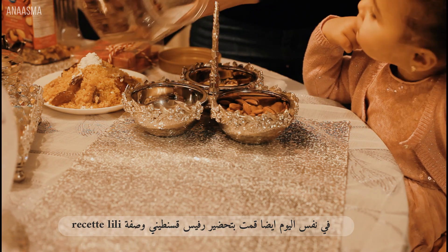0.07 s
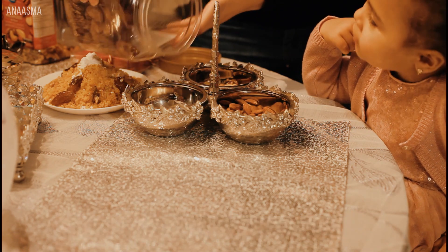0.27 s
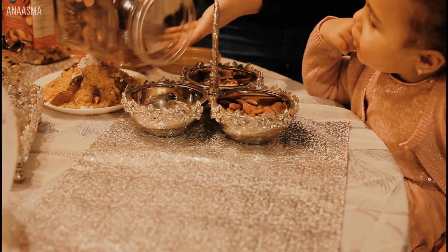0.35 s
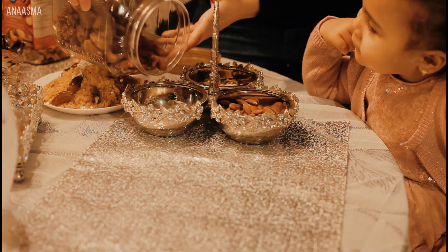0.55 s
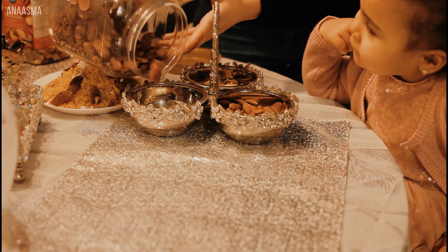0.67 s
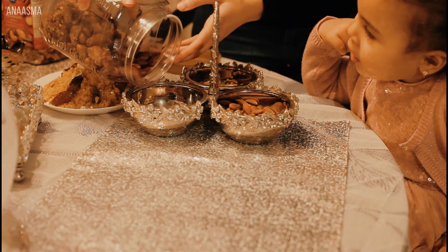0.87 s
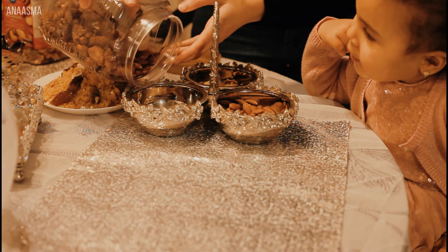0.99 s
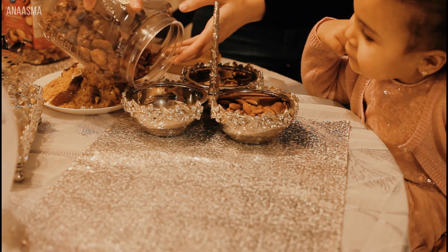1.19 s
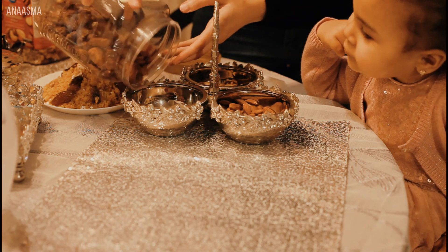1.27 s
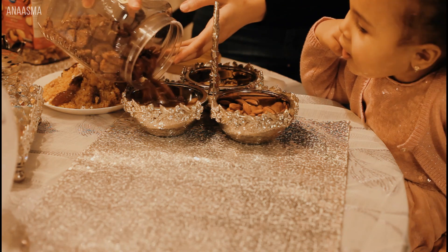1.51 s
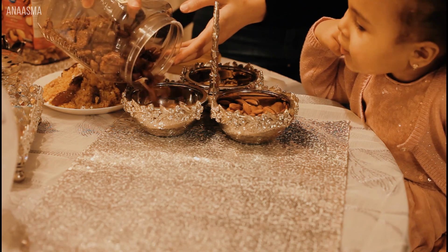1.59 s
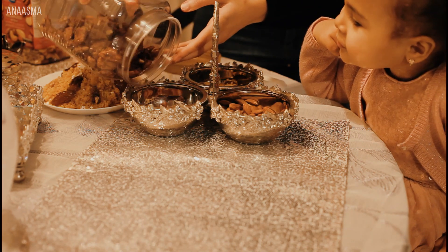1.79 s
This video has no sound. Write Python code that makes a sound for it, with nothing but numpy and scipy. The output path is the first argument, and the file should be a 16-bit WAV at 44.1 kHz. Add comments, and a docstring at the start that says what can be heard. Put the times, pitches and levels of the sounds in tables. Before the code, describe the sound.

Nuts knock and clatter hollowly inside a jar, loudest early on, then drop singly into a small ringing metal bowl; another brief tumble and more clinks follow, close microphone in a quiet room.

```python
"""Nuts from a jar into a metal bowl

Nuts tumble inside a tilted jar: each knock is a hollow thud of decaying sines plus a crack of noise.
They drop a few at a time into a small metal bowl: a noise tick, then sines ringing in families of modes.
A few nuts ping on the glass, one dull push comes through the table, and a rustle fades early on.
The room is quiet and adds a short echoing tail; the loudest knocks overload the input."""
import sys
import numpy as np
from scipy import signal
from scipy.fft import rfft, irfft
from scipy.io import wavfile

SR = 44100
rng = np.random.default_rng(int(sys.argv[2]) if len(sys.argv) > 2 else 0)


def file_out(sig):
    """Save sig as 16-bit WAV at sys.argv[1]."""
    # one column per channel
    cols = np.atleast_2d(sig).T
    # limit, then scale
    lim = np.clip(cols, -1, 1)
    pcm = np.round(lim * 32767).astype(np.int16)
    wavfile.write(sys.argv[1], SR, pcm)


def elevation(decibels):
    """Turn decibel levels (scalar or array-like) into linear amplitude ratios."""
    levels = np.asarray(decibels, float)
    return 10 ** (levels / 20)


N = 81585  # length in samples
RING_RISE_S = 0.0005  # how fast the bowl and the glass start to ring


def evened(x):
    """Scales a sound to an average (rms) level of 1."""
    return x / np.sqrt(np.mean(x ** 2) + 1e-20)


def read_table(points, hz):
    """Reads a table of (Hz, value) between its rows, on a log-frequency axis."""
    table_hz, value = np.transpose(points)
    return np.interp(np.log(hz + 1), np.log(table_hz + 1), value)


def level_curve(rows, column):
    """Gain over time, read from one dB column of a table whose first column is seconds."""
    rows = np.array(rows)
    return elevation(np.interp(np.arange(N) / SR, rows[:, 0], rows[:, column]))


def coloured(x, points):
    """Filters a sound by a table of (Hz, dB)."""
    hz = np.fft.rfftfreq(len(x), 1 / SR)
    return irfft(rfft(x) * elevation(read_table(points, hz)), len(x))


def low_cut(x, hz):
    """Steep high-pass filter: takes away what lies below hz."""
    return signal.sosfilt(signal.butter(4, hz, "high", fs=SR, output="sos"), x)


def add(mix, start_s, sound):
    """Mixes a sound in, starting at start_s seconds."""
    part = mix[max(round(start_s * SR), 0):][:len(sound)]
    part += sound[:len(part)]


def burst(points, t60, rise_s):
    """A short puff of coloured noise with a quick rise; t60 is the seconds it takes to fall 60 dB."""
    t = np.arange(2048) / SR
    noise = evened(coloured(rng.standard_normal(len(t)), points))
    return noise * elevation(-60 * t / t60) * (1 - np.exp(-t / rise_s))


def rattle(shapes, per_s, spread_db):
    """Random clicks of uneven size, each playing one of the shapes; rms 1 overall."""
    happens = rng.random(N) < per_s / SR
    size = elevation(spread_db * np.minimum(rng.exponential(1, N), 4)) * happens
    pick = rng.integers(0, len(shapes), N)
    return evened(sum(signal.oaconvolve(size * (pick == k), shape)[:N] for k, shape in enumerate(shapes)))


# Colour of the steady room tone. Each row: frequency in Hz, relative strength in dB per Hz.
AIR_COLOUR = [(20, -40), (300, -14), (500, -20), (850, -20), (1600, -4.5), (2300, -7), (5800, -7.5),
              (8000, -22), (16000, -69)]
# Colour of the early rustle. Each row: frequency in Hz, relative strength in dB per Hz.
RUSTLE_COLOUR = [(20, -18), (130, 1.5), (260, -1.5), (400, -27), (6000, -13), (10000, -17), (14000, -19)]
# Loudness of the early rustle. Each row: time in seconds, rms level in dB.
RUSTLE_LEVEL = [(0.0, -63), (.3, -65), (.42, -86.5), (1.85, -92)]


def background():
    """Two coloured noises: steady room tone, and a rustle with a low rumble that fades."""
    air_noise, rustle_noise = rng.standard_normal((2, N))
    air = elevation(-61.5) * evened(coloured(air_noise, AIR_COLOUR))
    rustle = level_curve(RUSTLE_LEVEL, column=1) * evened(coloured(rustle_noise, RUSTLE_COLOUR))
    return air + rustle


# Tones of the jar's hollow. Each row: pitch as a ratio of the main pitch, relative level in dB,
# time to fall 60 dB in seconds.
HOLLOW_TONES = [(0.599, -10, 0.032), (0.82, -2, 0.03), (0.999, 3.5, 0.028), (1.191, -5, 0.019),
                (1.8, -13.5, 0.02), (2.3, -11, 0.022)]


def thud(hz):
    """The air in the jar's hollow rings for a few cycles as decaying sines, peak 1."""
    t = np.arange(4096) / SR
    x = sum(elevation(db - 60 * t / t60) * np.sin(2 * np.pi * ratio * hz * t) for ratio, db, t60 in HOLLOW_TONES)
    x = x * (1 - np.exp(-t / 0.0019)) ** 2  # soft rise, in seconds
    return x / abs(x).max()


# Colour of a nut striking the wall. Each row: frequency in Hz, relative strength in dB per Hz.
CRACK_COLOUR = [(410, -20), (700, -49), (852, -7), (1870, -6.5), (5840, -13), (8100, -26), (10800, -25),
                (16000, -45.5)]
SHELL_HZ, SHELL_WIDTH, SHELL_DB = (1750, 4900), 0.16, 2  # range, width in log frequency, boost


def crack(t60):
    """A nut hitting the wall: a puff of noise with one broad resonance of its own."""
    x = burst(CRACK_COLOUR, t60, rise_s=0.0021)
    centre_hz = np.exp(rng.uniform(*np.log(SHELL_HZ)))
    away = np.log(np.fft.rfftfreq(len(x), 1 / SR) / centre_hz + 1e-9) / SHELL_WIDTH
    return irfft(rfft(x) * elevation(SHELL_DB * np.exp(-away ** 2)), len(x))


# The heap of nuts tumbling. Each row: time in seconds, level of the hollow rumble in dB,
# level of the crackle in dB.
TUMBLE_LEVELS = [(0.0, -50, -56.5), (.08, -63.5, -63), (.2, -53, -67.5), (.25, -44, -55), (.31, -43, -46.5),
                 (.36, -44, -50.5), (.42, -43.5, -53.5), (.46, -47, -48), (.53, -43, -46.5),
                 (.57, -50.5, -52), (.72, -51.5, -57.5), (.79, -61, -65.5), (.86, -69.5, -57.5),
                 (1.1, -61.5, -61.5), (1.19, -70.5, -69.5), (1.25, -57.5, -58), (1.32, -46, -49),
                 (1.36, -54.5, -53), (1.45, -45.5, -49), (1.51, -67, -52.5), (1.6, -72, -53.5),
                 (1.76, -92, -64), (1.85, -99, -69)]


def tumbling():
    """Many small random thuds blur into a rumble, and many tiny cracks into a crackle."""
    thuds = [thud(533 * ratio) for ratio in rng.uniform(0.806, 1.19, size=12)]  # around 533 Hz
    rumble = rattle(thuds, per_s=240, spread_db=2)
    crackle = rattle([crack(t60=0.0048) for _ in range(20)], per_s=1300, spread_db=2)
    return level_curve(TUMBLE_LEVELS, column=1) * rumble + level_curve(TUMBLE_LEVELS, column=2) * crackle


# Single nuts knocking the jar wall. Each row: start in seconds, level of the hollow thud in dB,
# main pitch of the hollow in Hz, level of the crack in dB above the thud.
KNOCKS = [(0.004, -43, 485, -7), (0.097, -40.5, 506, -34), (0.15, -44.5, 556, -22),
          (0.2235, -28.5, 494, -8), (0.256, -32, 493, 5), (0.267, -22, 504, -2), (0.297, -40.5, 640, 11.5),
          (0.325, -19.5, 563, 2), (0.336, -28, 648, -25), (0.34, -33.5, 485, -8), (0.382, -29.5, 505, 0),
          (0.391, -29.5, 496, 2.5), (0.436, -40, 533, 8.5), (0.48, -34.5, 424, 4), (0.499, -27, 550, -1.5),
          (0.514, -31.5, 506, -2), (0.636, -45.5, 530, 10), (0.686, -43.5, 520, 3.5),
          (0.7627, -40.5, 552, -3.5), (1.208, -44, 577, -26), (1.281, -38, 462, -14),
          (1.311, -33, 442, 1.5), (1.395, -42, 500, 7), (1.432, -36, 530, -15), (1.462, -45, 498, 15),
          (1.467, -37.5, 563, 12.5), (1.68, -51.5, 474, 7)]


def knocks():
    """Each knock sounds the hollow and the wall together: one thud and one crack."""
    out = np.zeros(N)
    for start_s, thud_db, hz, crack_db in KNOCKS:
        add(out, start_s, elevation(thud_db) * thud(hz))
        add(out, start_s, elevation(thud_db + crack_db) * crack(t60=0.021))
    return out


def jar():
    """Knocks over the tumbling heap; so small a body radiates little below 285 Hz."""
    return low_cut(knocks() + tumbling(), 285)


# How fast the room's tail dies. Each row: frequency in Hz, time to fall 60 dB in seconds.
ROOM_DECAY = [(300, 0.087), (1500, 0.16), (5000, 0.19), (12000, 0.039)]


def room(x):
    """Echoes off the room: sparse taps of random sign, each band dying at its own speed."""
    taps = np.zeros(SR // 2)
    at = np.arange(200, SR // 2 - 20, 20)
    taps[at + rng.integers(0, 20, len(at))] = rng.choice([-1., 1.], len(at))
    hz, t, bands = signal.stft(taps, SR, nperseg=256)
    fade = elevation(-60 * t / read_table(ROOM_DECAY, hz)[:, None])
    tail = signal.istft(bands * fade, SR, nperseg=256)[1]
    return signal.fftconvolve(x, tail / np.linalg.norm(tail))[:N]


# Nuts that strike the glass squarely. Each row: start in seconds, level in dB, pitch in Hz.
PINGS = [(0.393, -42.5, 3070), (0.4357, -34, 2390), (0.4363, -34.5, 3470), (0.64, -41, 3440)]


def pings():
    """Short pitched rings of glass: a sine that falls 60 dB in 0.023 s."""
    out, t = np.zeros(N), np.arange(2048) / SR
    for start_s, db, hz in PINGS:
        envelope = elevation(db - 60 * t / 0.023) * (1 - np.exp(-t / RING_RISE_S))
        add(out, start_s, envelope * np.sin(2 * np.pi * hz * t))
    return out


# Clusters of bowl modes. Each row: centre in Hz, spread in Hz (modes lie within twice this either side),
# relative level in dB, time to fall 60 dB in seconds for the ring alone.
BOWL_MODES = [(1354, 60, -7, 0.35), (1675, 66, -2, 0.32), (2077, 150, -15.5, 0.95), (3504, 68, -0.5, 0.18),
              (4570, 260, 0, 0.18), (5780, 90.6, 0, 0.39), (8420, 130, -10, 0.46), (9300, 69, -3.5, 0.15),
              (11000, 250, -3, 0.13), (13800, 500, -1.5, 0.037)]
# Borders between the low, middle, high and top families of modes. Each entry: frequency in Hz.
FAMILY_EDGES = [2600, 4400, 7200]
# Colour of the tick as a nut touches metal. Each row: frequency in Hz, relative strength in dB.
TICK_COLOUR = [(1000, 17), (1700, 19), (5700, 27), (12000, 21), (16000, 6)]
CLUSTER = 8  # modes in a cluster
STRIKE_SPREAD_DB, CLUSTER_SPREAD_DB = 3, 3  # random change per mode, and per top cluster
CONTACT_T60, AFTER_DB = 0.022, -13  # loud while the nut is in contact, then a fainter free ring
TICK_FOLLOWS = 0.64  # how far the tick takes the colour of the ring, 0 to 1


def clink(families_db, detune):
    """A tick and the ring of the bowl, each family of modes at its own strength."""
    hz, spread, db, t60 = np.repeat(BOWL_MODES, CLUSTER, axis=0).T[:, :, None]
    t, family_db = np.arange(6144) / SR, np.array(families_db)
    strike_db = STRIKE_SPREAD_DB * rng.standard_normal((len(hz), 1))
    # the top clusters vary with the spot struck
    spot_db = CLUSTER_SPREAD_DB * np.repeat(rng.standard_normal((len(BOWL_MODES), 1)), CLUSTER, axis=0)
    db = db + family_db[np.searchsorted(FAMILY_EDGES, hz)] - 13.5  # the last is the ring's share
    db = db + strike_db + spot_db * (hz > FAMILY_EDGES[-1])
    ring = (elevation(db - 60 * t / t60) * np.sin(2 * np.pi * (hz + spread * detune) * t)).sum(axis=0)
    ring = ring * (elevation(-60 * t / CONTACT_T60) + elevation(AFTER_DB)) * (1 - np.exp(-t / RING_RISE_S))

    tick = burst(TICK_COLOUR, t60=0.02, rise_s=0.00053) * elevation(-0.5)
    bands = np.searchsorted(FAMILY_EDGES, np.fft.rfftfreq(len(tick), 1 / SR))
    strongest_db = family_db.max()
    tick_db = TICK_FOLLOWS * (family_db[bands] - strongest_db) + strongest_db
    add(ring, 0, irfft(rfft(tick) * elevation(tick_db), len(tick)))
    return ring


# Nuts landing in the bowl. Each row: start in seconds, then the levels in dB of the low, middle,
# high and top families of modes.
DROPS = [(0.822, -25, -43, -38.5, -46), (0.8324, -34, -42, -69, -57), (0.8821, -35.5, -40.5, -63, -69),
         (0.9252, -35.5, -40.5, -41.5, -68), (0.956, -70, -58, -51, -47.5), (0.962, -41, -42, -42, -52),
         (1.0039, -33, -47.5, -43.5, -53), (1.0256, -31.5, -31.5, -37, -54), (1.0649, -44, -47, -58, -54),
         (1.1385, -41, -39, -47.5, -55), (1.1833, -43.5, -47.5, -51, -65), (1.4906, -29.5, -28.5, -37, -50),
         (1.4976, -31.5, -32.5, -32.5, -41), (1.5505, -44, -63, -51, -56), (1.5762, -36, -37.5, -39.5, -46),
         (1.6006, -49, -43, -44, -50), (1.723, -42.5, -40.5, -48.5, -57), (1.7872, -55, -48, -44.5, -68),
         (1.7917, -45, -35, -43, -48)]
# Colour of the settling touches. Each entry: relative level in dB of the low, middle, high, top family.
SETTLE_FAMILIES_DB = [-26, -6.5, -13, -12.5]


def bowl():
    """Nuts land one by one; those already in the bowl settle with light touches."""
    out = np.zeros(N)
    # the same modes for every blow
    places = (np.arange(CLUSTER) + rng.random((len(BOWL_MODES), CLUSTER))) / CLUSTER
    detune = (4 * places - 2).reshape(-1, 1)
    for start_s, *families_db in DROPS:
        add(out, start_s, clink(families_db, detune))
    touches = [clink(SETTLE_FAMILIES_DB, detune) for _ in range(6)]
    settling = rattle(touches, per_s=70, spread_db=3.5)
    after_first_drop = np.arange(N) / SR > DROPS[0][0]
    out = out + elevation(-68.5) * settling * after_first_drop
    return low_cut(out, 1020)  # so small a body radiates little below this


# A dull push through the table. Each row: start in seconds, peak level in dB.
BUMPS = [(1.4972, -54.5)]


def bumps():
    """A one-sided low push that peaks after 0.0007 s and dies away."""
    out, u = np.zeros(N), np.arange(2048) / SR / 0.0007
    for start_s, db in BUMPS:
        add(out, start_s, elevation(db) * u * np.exp(1 - u))
    return out


def scene():
    """Jar, glass and bowl with the room's tail, plus the push and the background."""
    near = jar() + pings() + bowl()
    return (near + elevation(-11.5) * room(near) + bumps() + background())[None]


def low_pass(x):
    """Removes everything above the highest recorded frequency."""
    return signal.sosfilt(signal.butter(12, 16460, fs=SR, output="sos"), x)


def record(dry):
    """The overloaded input cuts peaks off flat, slightly lopsided; then a low-pass at 16200 Hz."""
    clipped = np.clip(dry, -0.084, 0.078)
    mix = signal.oaconvolve(clipped, signal.firwin(255, 16200, fs=SR)[None], "same")
    return low_pass(mix)


dry = scene()
out = record(dry)
file_out(out)
```